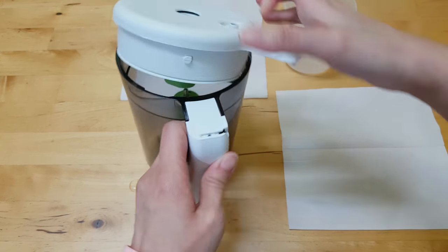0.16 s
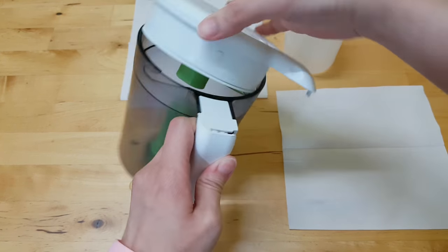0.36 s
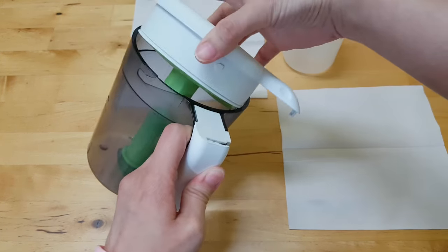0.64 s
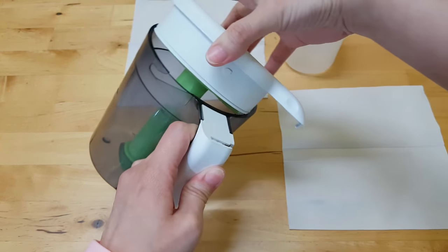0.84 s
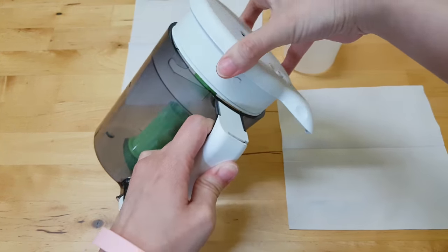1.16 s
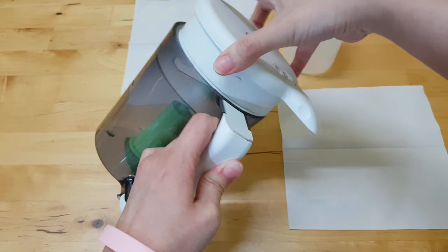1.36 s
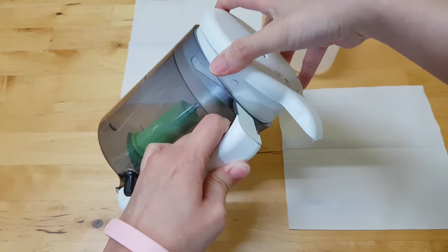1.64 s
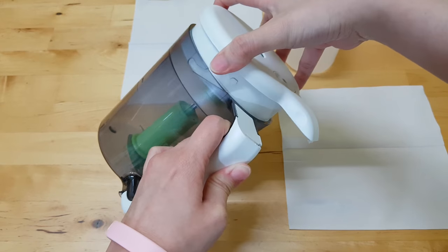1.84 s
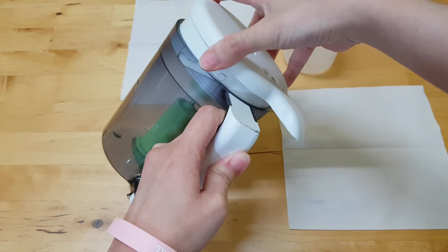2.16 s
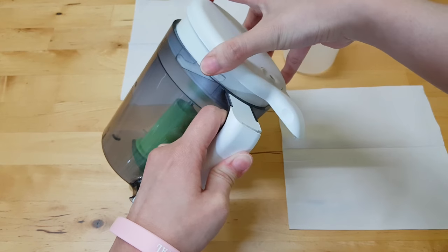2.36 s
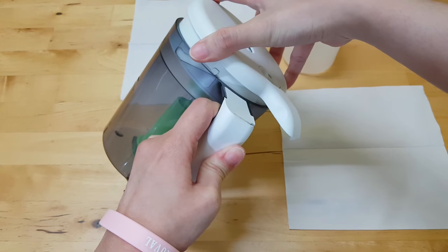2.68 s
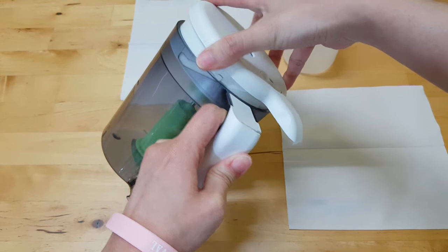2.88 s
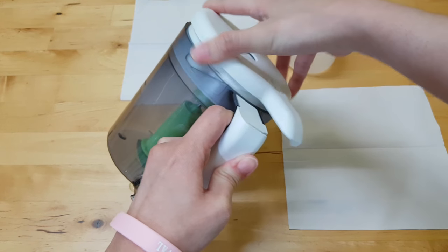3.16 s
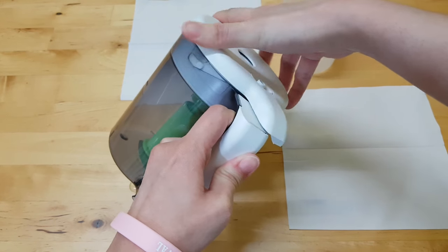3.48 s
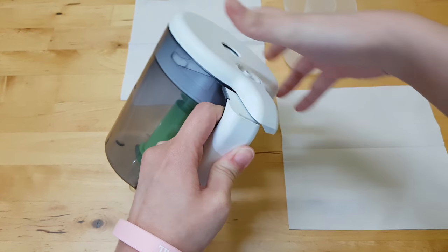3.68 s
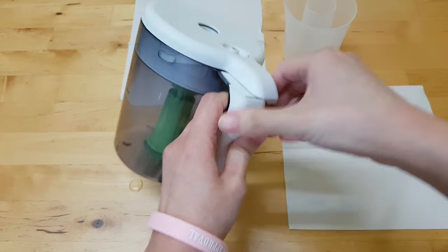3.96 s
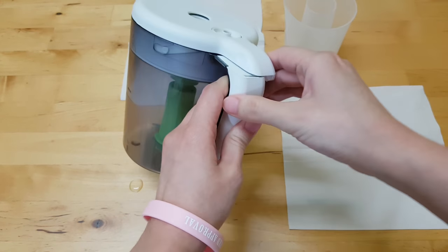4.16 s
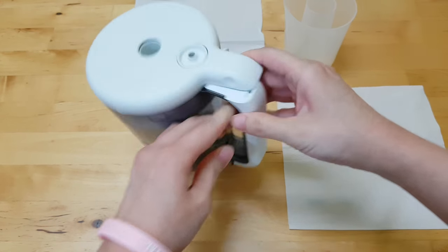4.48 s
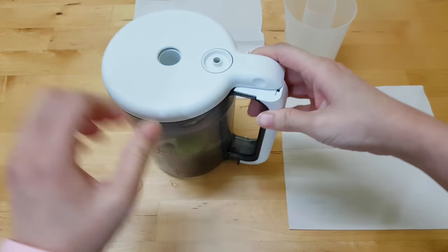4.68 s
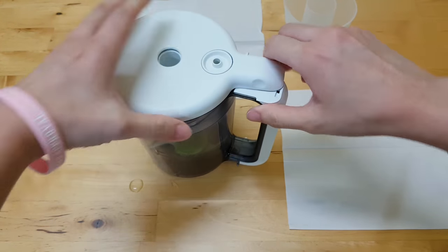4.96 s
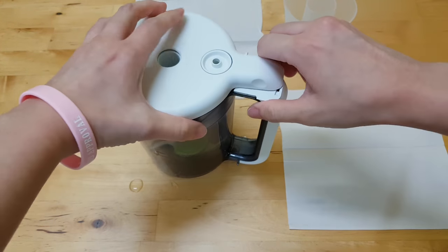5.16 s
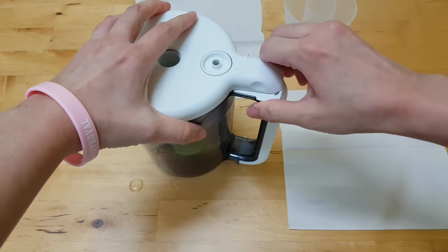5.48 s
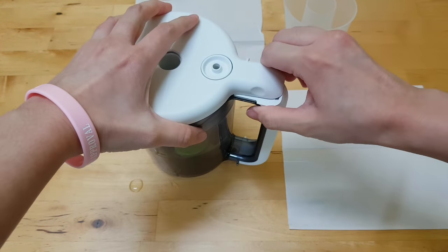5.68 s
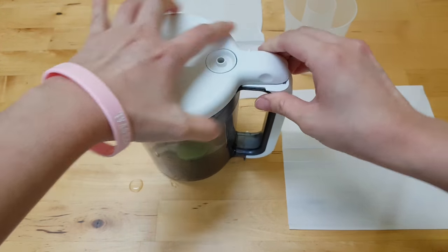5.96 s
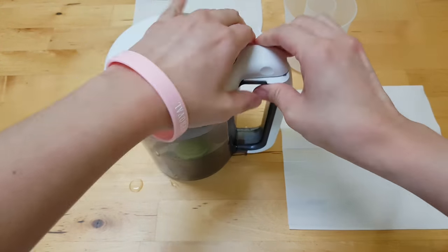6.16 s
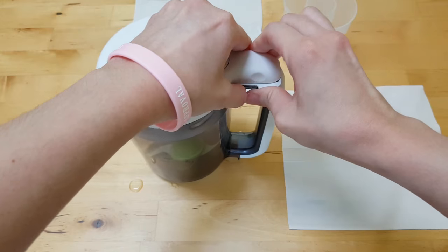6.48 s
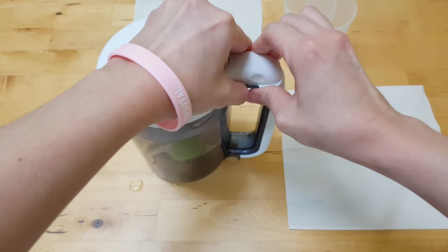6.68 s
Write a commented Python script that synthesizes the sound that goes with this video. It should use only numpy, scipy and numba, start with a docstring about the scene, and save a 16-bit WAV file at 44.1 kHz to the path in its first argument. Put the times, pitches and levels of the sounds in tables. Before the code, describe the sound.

Close up in a small hard room, a hard plastic lid is fitted to a hollow jug. Soft early knocks, firmer clacks, then a rapid scraping clatter lead to a loud clunk as the jug lands on a wooden table. Afterwards only small knocks and clicks remain. Skin and sleeve rustle and a low mains hum lie beneath; the hum drops away after the middle, and a very faint far car horn sounds once.

```python
"""Hands fit a hard plastic lid onto a jug on a wooden table, close by: knocks, scrapes and clicks.
Each blow or tiny slip sets jug, lid and table ringing at their own pitches (modes), in a small hard room.
Behind them are soft noises: skin and sleeves rustle as patchy hiss, and room air and town rumble drift.
A wavering mains hum, a sine tone, becomes much fainter part way; a far car horn, a stack of
sines, sounds once. The level dips briefly once."""
import sys
import numpy as np
from scipy import signal
from scipy.fft import rfft, irfft
from scipy.io import wavfile
from scipy.ndimage import uniform_filter1d
from numba import njit

SR = 44100
rng = np.random.default_rng(int(sys.argv[2]) if len(sys.argv) > 2 else 0)


def persist_wave(psi):
    """Save psi, clipped to +-1, as 16-bit WAV."""
    counts = np.round(np.clip(psi, -1, 1) * 32767).astype(np.int16)
    wavfile.write(sys.argv[1], SR, np.atleast_2d(counts).T)


N = 301194
TIME = np.arange(N) / SR


def undb(db):
    """Turns dB into a gain."""
    return 10 ** (np.asarray(db) / 20)


def unit(x):
    """Scales to an rms (average strength) of 1."""
    return x / np.sqrt(np.mean(x ** 2))


def on_hz(table, hz):
    """Reads a table at any frequency, on a log-frequency axis."""
    f, v = np.transpose(table)
    return np.interp(np.log(np.maximum(hz, 1)), np.log(f), v)


def colour(x, table):
    """Shapes the spectrum of x; unit noise stays at unit power."""
    gain = undb(on_hz(table, np.fft.rfftfreq(x.shape[-1], 1 / SR)))
    return irfft(rfft(x) * unit(gain), x.shape[-1])


def decay(x, t60_s):
    """Turns each spike into an envelope that falls 60 dB in t60_s."""
    return signal.lfilter([1], [1, -np.exp(-np.log(1000) / (t60_s * SR))], x)


def walk(rate):
    """A slow random drift of rms 1: random levels, each kept 1 / rate seconds, smoothed twice."""
    keep = int(SR / rate)
    steps = np.repeat(rng.standard_normal(N // keep + 1), keep)
    smooth = uniform_filter1d(uniform_filter1d(steps, keep), keep)
    return unit(smooth[:N])


# how alike the left and right noises are: (f/Hz, likeness; 1 = the same, 0 or less = unrelated)
NOISE_LIKENESS = [(60, 0.94), (130, 0.94), (290, 0.91), (640, 0.81), (1410, -1.4), (3100, 0.19),
                  (6820, -0.96), (15000, -0.077)]


def pair(size):
    """Left and right noise from a shared and an opposed part: alike in the bass, little in the treble."""
    alike = np.clip(on_hz(NOISE_LIKENESS, np.fft.rfftfreq(size, 1 / SR)), 0, 1)
    noises = rfft(rng.standard_normal((2, size)))
    mid, side = noises * np.sqrt([(1 + alike) / 2, (1 - alike) / 2])
    return irfft(np.array([mid + side, mid - side]), size)


# colour of the room air and town rumble: (f/Hz, relative level/dB per Hz)
AIR_TONE = [(12, -39), (20, -20.5), (91, -10), (154, -5.5), (210, -6), (241, -12.5), (310, -11),
            (590, -18.5), (780, -32), (1220, -22.5), (1760, -32), (4420, -33.5), (5850, -69),
            (14700, -46.5), (16000, -65)]
AIR_DB = -52.5


def air():
    """Room air and town rumble: coloured noise whose level drifts slowly."""
    return colour(pair(N), AIR_TONE) * undb(AIR_DB + 0.13 * walk(3.42))


# strength of the hum over time, before its waver: (t/s, rms level/dB)
HUM_LEVEL = [(0, -45), (4.17, -45), (4.3, -64.5)]
HUM_HZ, HUM_WAVER_DB = 100, .6


def hum():
    """A sine at twice the mains frequency; pitch and level waver, and it drops to a faint level."""
    db = np.interp(TIME, *np.transpose(HUM_LEVEL)) + HUM_WAVER_DB * walk(8.0)
    phase = 2 * np.pi * np.cumsum(HUM_HZ + 0.45 * walk(5.33)) / SR
    return np.sqrt(2) * undb(db) * np.sin(phase)  # sqrt(2) takes rms to peak


# tone of the far horn: (f/Hz, level/dB relative to HORN_DB)
HORN_COLOUR = [(420, -3), (840, 3), (1260, 1), (1700, -4), (2100, 4), (2530, 3), (2950, 3), (3400, 0),
               (4300, -14)]
HORN_S, HORN_LENGTH_S, HORN_FADE_S = 5.03, .55, .06
HORN_HZ, HORN_SAG_HZ_PER_S = 422, 10  # pitch at its start, and how fast it sinks
HORN_DB = -72.5


def horn():
    """A far car horn: a slowly sagging stack whose partials swell apart on the long way in."""
    t = TIME - HORN_S
    phase = 2 * np.pi * np.cumsum(HORN_HZ - HORN_SAG_HZ_PER_S * t) / SR
    edge = np.clip(np.minimum(t, HORN_LENGTH_S - t) / HORN_FADE_S, 0, 1)
    out = 0
    for k in range(1, 11):
        gain = undb(on_hz(HORN_COLOUR, k * HORN_HZ) + 3.5 * walk(25))
        start = 2 * np.pi * rng.random((2, 1))  # left and right start at different phases
        out = out + gain * np.sin(k * phase + start)
    return out * edge * undb(HORN_DB)


# skin and sleeves moving, before the patchiness and the left-right tilt: (t/s, level/dB)
RUSTLE_LEVEL = [(0, -52.5), (.1, -55.5), (.32, -51.5), (.66, -55), (1.3, -57), (1.63, -56), (2.06, -55),
                (2.3, -56), (3.55, -55.5), (4.45, -56.5), (4.95, -61.5), (5.32, -60.5), (5.58, -70.5),
                (5.88, -62), (6.0, -53), (6.2, -64.5), (6.83, -68.5)]
# colour of that hiss: (f/Hz, relative level/dB per Hz)
RUSTLE_COLOUR = [(350, -18), (600, -0.5), (737, -6.5), (957, -3), (1640, -12), (2950, -8), (3830, -15),
                 (9760, -21), (14700, -42), (16000, -52)]
RUSTLE_PATCHY_DB, RUSTLE_LEFT_DB = 1.7, 1.5  # the second is left minus right


def rustle():
    """Skin and cloth sliding: a fine patchy hiss, a little stronger on the left."""
    db = np.interp(TIME, *np.transpose(RUSTLE_LEVEL)) + RUSTLE_PATCHY_DB * walk(25.25)
    db = db + RUSTLE_LEFT_DB / 2 * np.array([[1], [-1]])
    return colour(rng.standard_normal((2, N)), RUSTLE_COLOUR) * undb(db)


# time the echoes of the room take to fall 60 dB: (f/Hz, t60/s)
ROOM_FALL = [(100, 0.64), (300, 0.24), (1000, 0.35), (3000, 0.39), (8000, 0.26), (15000, 0.17)]
# strength of those echoes: (f/Hz, level/dB)
ROOM_LEVEL = [(100, -8), (300, -1.5), (1000, -4), (3000, -2), (9000, -1.5)]
ROOM_START_S = 0.0014  # silent until then, full at twice that


def room(x):
    """Echoes of a small hard room: a dense noise tail whose bands each die away at their own pace."""
    size = SR // 2
    t, hz = np.arange(size) / SR, np.fft.rfftfreq(size, 1 / SR)
    noise, tail = rfft(pair(size)), 0
    for centre in 62.5 * 2. ** np.arange(9):
        band = np.clip(1 - np.abs(np.log2(np.maximum(hz, 1) / centre)), 0, 1)
        fall = unit(undb(-60 * t / on_hz(ROOM_FALL, centre)))
        tail = tail + irfft(noise * band, size) * fall * undb(on_hz(ROOM_LEVEL, centre))
    tail *= np.clip(t / ROOM_START_S - 1, 0, 1)
    return signal.fftconvolve(x, tail / np.sqrt(size), axes=1)[:, :N]


SLIPS_PER_S, SLIP_SPREAD_DB = 1000, 3.5


def slips():
    """Stick-slip: rubbing is dense clicks at random moments, a few of them much larger."""
    clicks = rng.random(N) < SLIPS_PER_S / SR
    size_db = SLIP_SPREAD_DB * np.minimum(rng.exponential(size=N), 3)
    return unit(clicks * undb(size_db))


# scrapes of lid on rim: (start t/s, length t/s, level/dB before the mix below, brightness/dB)
RUBS = [(0.122, 0.48, -54.5, 1.5), (.76, .12, -66.5, 8.5), (2.072, 0.05, -43.5, 7.5),
        (2.4, 0.16, -54.5, -10), (3.08, .08, -51, -1), (3.252, .15, -24.5, -0.5), (4.059, 0.084, -48, -3.5),
        (4.51, 0.042, -49, 8.5), (4.6, .04, -40.5, 2.5), (4.658, 0.085, -24.5, -6.5),
        (4.95, 0.26, -65.5, 6.5), (5.33, 0.14, -68.5, 8.5), (5.93, 0.056, -54, -4), (6.29, 0.13, -62, 0),
        (6.446, 0.076, -54.5, -0.5)]
# what a scrape excites, in rows body, wall, rim, hiss: (level/dB, share of the brightness)
RUB_MIX = [(0.5, 0), (-5, 0.36), (-5, 1.1), (-14, 0.82)]
SCRAPE_ATTACK_S, SCRAPE_T60_S = 0.014, .3


def scrape_gain(part):
    """Force of the rubbing on one part: it rises, stays and dies away, ending 40 dB down."""
    out = np.zeros(N)
    mix_db, bright_share = RUB_MIX[part]
    for s, length, db, bright_db in RUBS:
        rise = np.clip((TIME - s) / SCRAPE_ATTACK_S, 0, 1)
        fall_db = -60 * np.maximum(TIME - s - length, 0) / SCRAPE_T60_S
        out += rise * (fall_db > -40) * undb(db + mix_db + bright_share * bright_db + fall_db)
    return out


@njit
def ring(x, turn, fade, fade_speed, rise, skew):
    """One mode that swells while the contact lasts, then fades; left and right differ in phase."""
    y, push, z = np.empty((2, len(x))), 0j, 0j
    for i in range(len(x)):
        push = push * turn * (1 - rise) + rise * x[i] + 1e-18
        z = z * turn * (1 - fade * fade_speed[i]) + push
        y[0, i], y[1, i] = (z * skew).imag, (z * skew.conjugate()).imag
    return y


FAVOUR_DB, FAVOUR_OCTAVES, SCATTER_DB = 18, 0.067, 3  # where a blow lands picks its modes
RUB_FAVOUR_DB = 7.5  # extra push for the modes that rubbing wakes most
# phase skew of a mode between left and right; share of modes that lead on the left
PORTS_RAD_PER_KHZ, PORTS_MOST_RAD, LEFT_FIRST = .8, .65, .7


def nearness(hz, favour_hz):
    """How close a mode lies to the favoured pitch: 1 on it, falling to 0 away from it."""
    return np.exp(-(np.log2(hz / favour_hz) / FAVOUR_OCTAVES) ** 2)


def shell(modes, blow_s, blow_db, favour_hz, rubbing, rub_hz, fade_speed, swell_s):
    """Blows and slips ring one family of modes, with a boost for those near the favoured pitch."""
    at, slip = (blow_s * SR).astype(int), np.flatnonzero(rubbing)
    hz, db, t60 = np.transpose(modes)
    near = nearness(hz, favour_hz[:, None])
    share = undb(db + FAVOUR_DB * near + SCATTER_DB * rng.standard_normal(near.shape))
    share *= np.where(near > .1, 1, rng.choice([-1, 1], near.shape))
    # the modes together carry the level of the blow
    share *= (undb(blow_db) / np.sqrt(np.sum(share ** 2, axis=1)))[:, None]
    rub_hz = (rub_hz + 0 * TIME)[slip]
    rub = undb(db[:, None] + RUB_FAVOUR_DB * nearness(hz[:, None], rub_hz))
    rub /= np.sqrt(np.sum(rub ** 2, axis=0))
    rise = min(1 / (swell_s * SR), 1.)
    out = np.zeros((2, N))
    for k in range(len(modes)):
        fade, push = np.log(1000) / (t60[k] * SR), np.zeros(N)
        # a steady rub builds up in a mode, so its push is scaled by the loss
        push[slip] = rubbing[slip] * rub[k] * np.sqrt(4 * fade) * rng.choice([-1, 1], len(slip))
        push[at] += share[:, k]
        skew = min(PORTS_RAD_PER_KHZ * hz[k] / 1000, PORTS_MOST_RAD) * np.sign(LEFT_FIRST - rng.random())
        out += ring(push, np.exp(2j * np.pi * hz[k] / SR), fade, fade_speed, rise, np.exp(1j * skew))
    return out


# knocks: (t/s, low mode level/dB, favoured low mode f/Hz, wall level/dB, rim level/dB,
# favoured rim f/Hz, crack level/dB)
BLOWS = [(0.052, -38.5, 381, -59, -48.5, 2300, -67), (0.2374, -27, 229, -31, -47, 2560, -46),
         (0.2534, -30.5, 234, -50, -39, 2140, -46), (0.3026, -27.5, 391, -22.5, -26.5, 2163, -66),
         (0.3255, -24, 340, -52, -53, 2110, -70), (0.3516, -34, 348, -55, -59, 2150, -49),
         (0.414, -30, 342, -53, -36.5, 2490, -50), (0.4362, -20, 346, -36.5, -39, 2230, -58),
         (0.4548, -29, 345, -35, -55, 2220, -69), (0.522, -31, 206, -61, -57, 2680, -60),
         (0.5653, -32, 222, -56, -61, 2520, -53), (0.6183, -37, 207, -67, -62, 2410, -50),
         (1.49, -17.5, 338, -33.5, -30.5, 2694, -46), (1.5043, -30, 318, -29.5, -34, 2044, -50),
         (1.5912, -12.5, 336, -22, -26.5, 3234, -35.5), (1.883, -41, 311, -35, -30, 2900, -37),
         (1.8881, -26, 309, -26, -20.5, 2827, -34.5), (2.049, -31, 233, -28, -25.5, 3053, -34.5),
         (2.0813, -25.5, 331.8, -27, -20.5, 2770, -35), (2.0946, -18.5, 294, -23.5, -23, 2430, -33),
         (2.1189, -22.5, 172.6, -26.5, -24, 2800, -45), (2.4163, -43, 230, -47, -63, 2020, -59),
         (2.7006, -32, 183.5, -44, -39, 3180, -37), (3.0719, -26, 201.7, -52, -52, 2470, -48),
         (3.0814, -26.5, 156, -33, -26, 3000, -26.5), (3.0897, -27, 155.4, -30.5, -22, 3007, -51),
         (3.1088, -22.5, 172, -28.5, -38, 2640, -29.5), (3.2272, -32.5, 151, -34, -30.5, 2930, -36.5),
         (3.253, -19.5, 239, -27, -33, 2090, -47), (3.2782, -15.5, 257, -18, -16.5, 2770, -35),
         (3.3067, -29, 90, -20.5, -25, 2110, -54), (3.3395, -14, 179, -18.5, -21, 2050, -50),
         (3.3764, -20, 303, -16.5, -20, 2090, -41), (3.4109, -18.5, 208, -14, -17, 2070, -40),
         (3.9216, -43, 142, -41, -52, 1910, -45.5), (4.0813, -37, 143, -43, -41, 2330, -62),
         (4.094, -24.5, 188, -25.5, -31.5, 2248, -49), (4.1906, -38, 322, -57, -58, 2850, -65),
         (4.498, -34, 228.5, -59, -54, 2460, -64), (4.5137, -29.5, 192, -45, -30.5, 2600, -50),
         (4.5472, -22, 224, -26.5, -29.5, 2200, -64), (4.5984, -17, 210.6, -24.5, -19.5, 2180, -41.5),
         (4.6203, -19.5, 197, -18, -23, 2170, -57), (4.6614, -5.5, 202, -17, -8.5, 2810, -29.5),
         (4.6885, -10, 192, -10, -13, 2034, -35), (4.705, -9.5, 211, -34, -15, 2570, -46),
         (4.7198, -24, 207, -16, -19, 2120, -63), (4.759, -28, 249, -13, -15.5, 2160, -40),
         (4.7844, -48, 207, -19.5, -21, 2260, -64), (5.259, -63, 171, -68, -55, 2184, -44),
         (5.3194, -68, 366, -59, -37.5, 3150, -37), (5.3492, -63, 186, -46, -48, 2500, -62),
         (5.917, -37, 294.5, -33, -42, 2300, -58), (5.9217, -19.5, 298, -32, -32, 2810, -47),
         (5.9287, -18, 229, -24.5, -27, 2270, -52.5), (5.9503, -23.5, 235, -36, -36, 2207, -64),
         (6.03, -40.5, 121, -60, -50, 2300, -60), (6.3123, -39.5, 228.7, -48, -62, 2240, -71),
         (6.455, -45, 430, -48, -49, 2250, -57), (6.479, -30, 228.5, -41, -47, 2223, -55),
         (6.501, -34, 304.5, -31.5, -39.5, 1979, -62), (6.5296, -39, 221, -33, -58, 2010, -70)]
# changes in the ringing, each lasting until the next row: (from t/s, favoured wall f/Hz,
# speed of fading as a factor)
RINGING = [(0, 1188, 0.92), (1.4, 1294, 0.7), (1.55, 1395, 1.25), (2.07, 1327, 1.5), (3.2, 1402, 1.33),
           (4.0, 1317, 0.89), (4.4, 1242, 0.86), (4.61, 1293, 1.7), (4.65, 1012, 1.32), (4.71, 950, 1.07),
           (5.2, 1428, 0.86), (5.8, 1404, 1.3), (6.2, 1430, 0.69), (6.49, 1473, 1.85)]
# low modes of the hollow body and the wooden table under it:
# (f/Hz, relative level/dB, t60/s at fading speed 1)
LOW_MODES = [(82, -27, 0.046), (98.6, 0.5, 0.068), (120, -12, 0.28), (175.4, -8.5, 0.29),
             (188.4, -8.5, 0.071), (207, -1, 0.16), (234.1, 1.5, 0.16), (265.9, -5, 0.23), (317, -3, 0.14),
             (341, 1.5, 0.069), (387.3, -1.5, 0.085), (419, -1, 0.11), (482.5, 1.5, 0.075),
             (566.3, 1.5, 0.049), (637, -13.5, 0.15), (666, -6, 0.05), (789, -4, 0.03)]
# modes of the wall: (f/Hz, relative level/dB, t60/s at fading speed 1)
WALL_MODES = [(938, 3, 0.028), (1061, -1, 0.057), (1169, -4.5, 0.095), (1220, -2.5, 0.042),
              (1368, -3, 0.075), (1452, -2, 0.041), (1480, -1, 0.027), (1629, -2, 0.045),
              (1750, -11.5, 0.028)]
# modes of the rim: (f/Hz, relative level/dB, t60/s at fading speed 1)
RIM_MODES = [(1810, -0.5, 0.072), (1950, 3, 0.035), (2114, 1.5, 0.082), (2188, -2, 0.043),
             (2320, 0.5, 0.064), (2406, -5, 0.096), (2540, 6.5, 0.029), (2767, 4, 0.0081),
             (2935, 0.5, 0.042), (3127, 0, 0.034), (3463, -6.5, 0.065), (3327, -2.5, 0.025),
             (3516, 1.5, 0.02), (3804, -2.5, 0.025), (4150, -5, 0.042), (4820, -13, 0.025)]
# colour of the cracks and the rubbing hiss: (f/Hz, relative level/dB per Hz)
CRACK_COLOUR = [(710, -20), (1200, -11.5), (1380, -9.5), (1770, -22.5), (2120, -10.5), (2360, -10),
                (2570, -10), (7390, -19.5), (12700, -34.5), (15000, -89)]
RUB_LOW_HZ, RUB_RIM_HZ = 203.2, 2140  # pitches rubbing favours; the wall's comes from RINGING
CRACK_T60_S = 0.036
TICK_DB, TICK_T60_S = -6.5, 0.0029  # the first instant of each crack stands out


def jug():
    """Low, wall and rim modes plus the crack of each hard contact and the hiss of the rubbing."""
    s, low_db, low_hz, wall_db, rim_db, rim_hz, crack_db = np.transpose(BLOWS)
    since, wall_hz, fading = np.transpose(RINGING)

    def value_at(values, t):
        """Picks the value from the latest row at time t."""
        return values[np.maximum(np.searchsorted(since, t) - 1, 0)]

    fade_speed = value_at(np.clip(fading, .3, 4), TIME)
    slip = slips()
    low_rub, wall_rub, rim_rub = [slip * scrape_gain(part) for part in range(3)]
    # the heavy body answers later than the stiff rim
    out = shell(LOW_MODES, s, low_db, low_hz, low_rub, RUB_LOW_HZ, fade_speed, swell_s=0.0016)
    out += shell(WALL_MODES, s, wall_db, value_at(wall_hz, s), wall_rub, value_at(wall_hz, TIME),
                 fade_speed, swell_s=0.00057)
    out += shell(RIM_MODES, s, rim_db, rim_hz, rim_rub, RUB_RIM_HZ, fade_speed, swell_s=0.00017)
    blows = np.zeros(N)
    blows[(s * SR).astype(int)] = undb(crack_db)
    crack = decay(blows, CRACK_T60_S) + undb(TICK_DB) * decay(blows, TICK_T60_S)
    # the slips, each fading briefly, roughen a steady hiss
    grit = unit(1.1 + unit(decay(slip, t60_s=0.018)))
    hiss = grit * scrape_gain(part=3)
    return out + colour(pair(N) * (crack + hiss), CRACK_COLOUR)


BOTTOM_HZ = 70


def scene():
    """The jug and lid in their room over air, hum, horn and rustle."""
    parts = jug()
    # small parts radiate little deep bass
    high_pass = signal.butter(4, BOTTOM_HZ, "high", fs=SR, output="sos")
    parts = signal.sosfilt(high_pass, parts + room(parts))
    return parts + hum() + horn() + air() + rustle()


# difference in colour between left and right: (f/Hz, left minus right level/dB)
LEFT_TILT = [(60, 3), (110, 0.5), (200, 0.5), (380, 0.5), (700, 0.5), (1290, 3), (2380, 3.5), (4400, 2),
             (8120, 3.5), (15000, -7)]
CEILING = 1
DROPOUT_S, DROPOUT_LENGTH_S = 2.6904, .0088
TOP_HZ = 15450


def record(dry):
    """Left and right differ in colour; peaks are rounded; the level dips briefly; the top is cut."""
    tilt = on_hz(LEFT_TILT, np.fft.rfftfreq(N, 1 / SR)) / 2
    x = irfft(rfft(dry) * undb([tilt, -tilt]), N)
    x = CEILING * np.tanh(x / CEILING)
    # seconds outside the dip, negative inside it
    gap = np.abs(TIME - DROPOUT_S - DROPOUT_LENGTH_S / 2) - DROPOUT_LENGTH_S / 2
    x = x * np.clip(gap / .0004, .02, 1)
    return signal.sosfilt(signal.ellip(10, .2, 80, TOP_HZ, fs=SR, output="sos"), x)


dry = scene()
out = record(dry)
persist_wave(out)
```